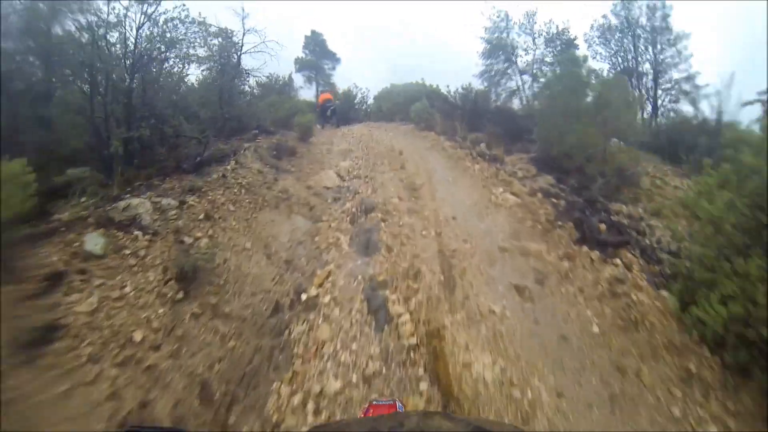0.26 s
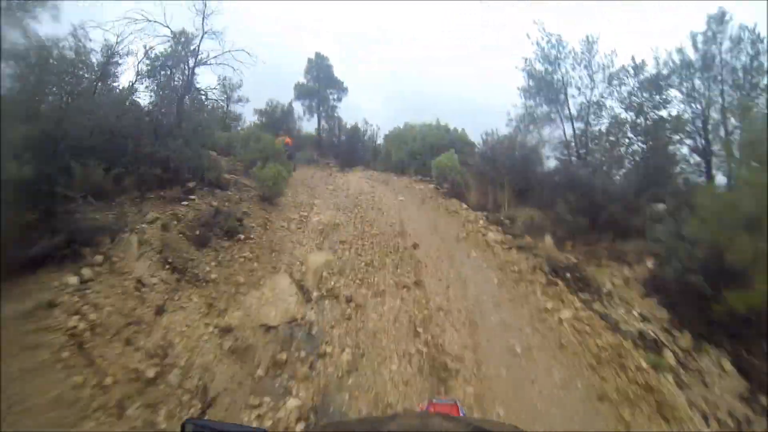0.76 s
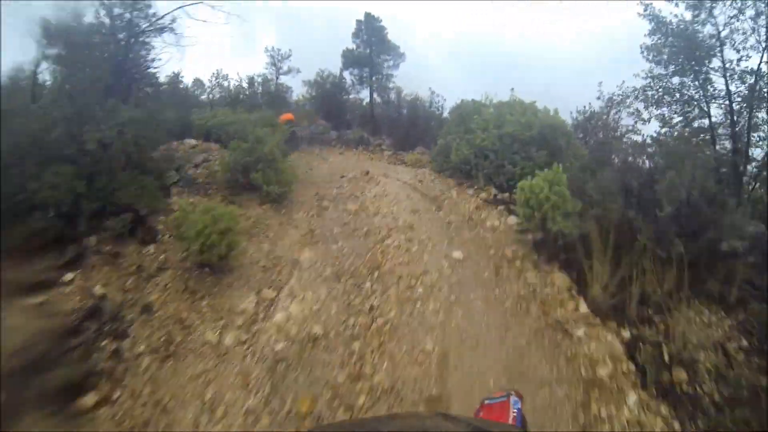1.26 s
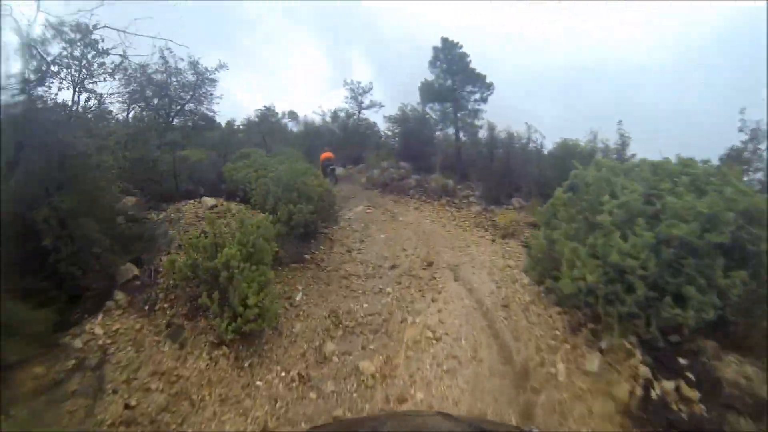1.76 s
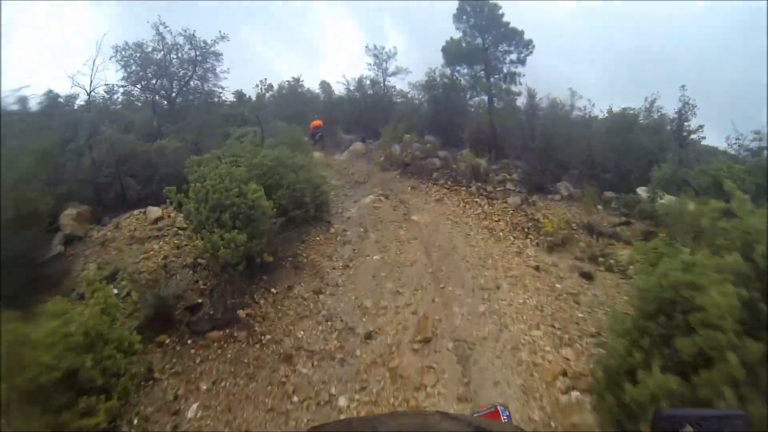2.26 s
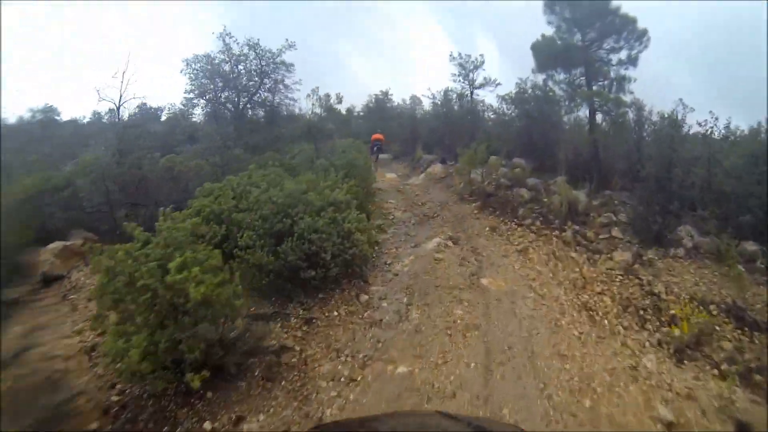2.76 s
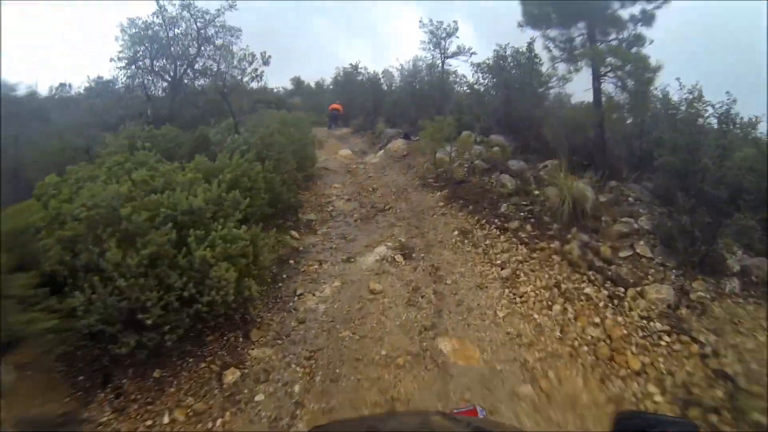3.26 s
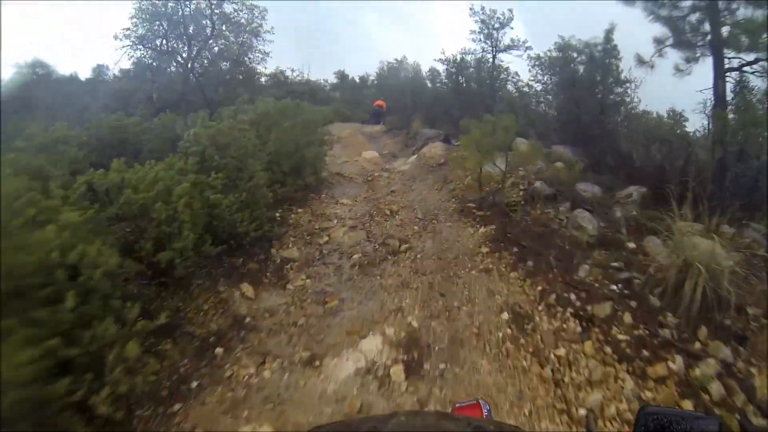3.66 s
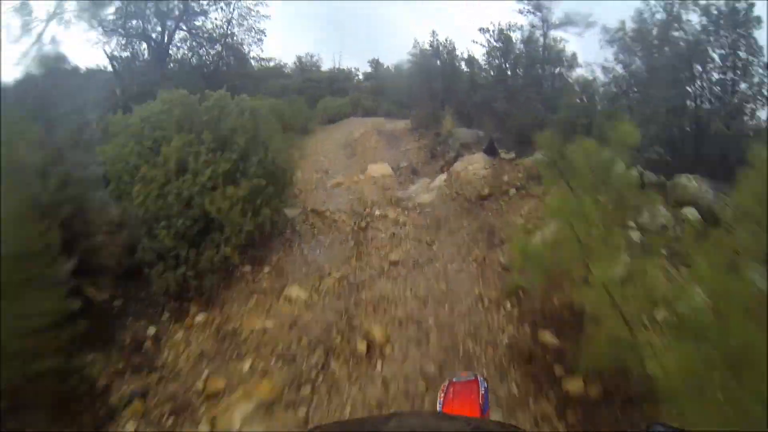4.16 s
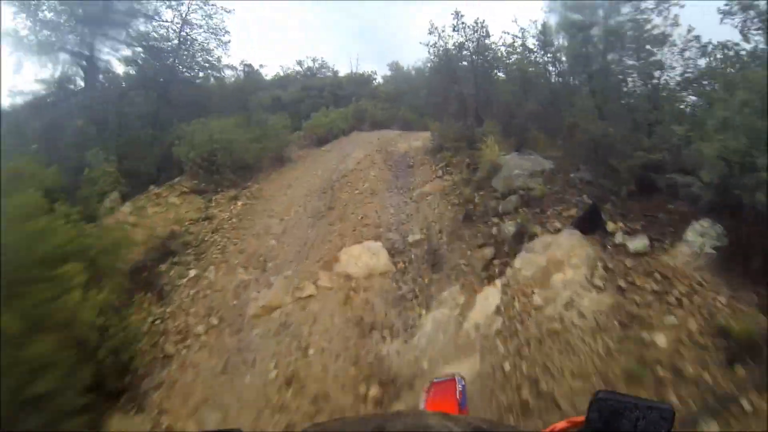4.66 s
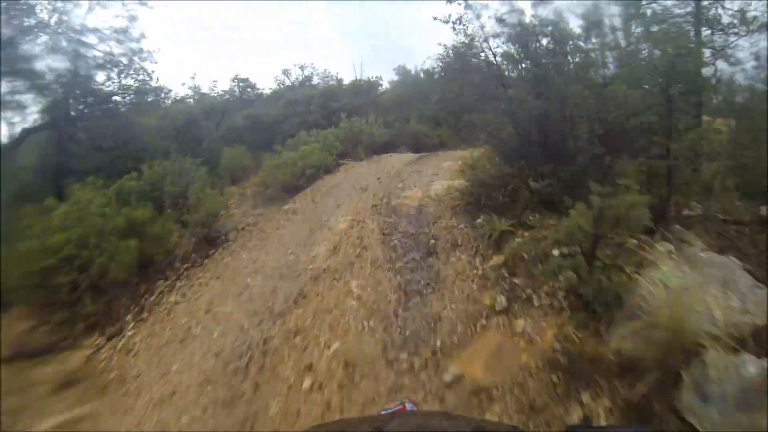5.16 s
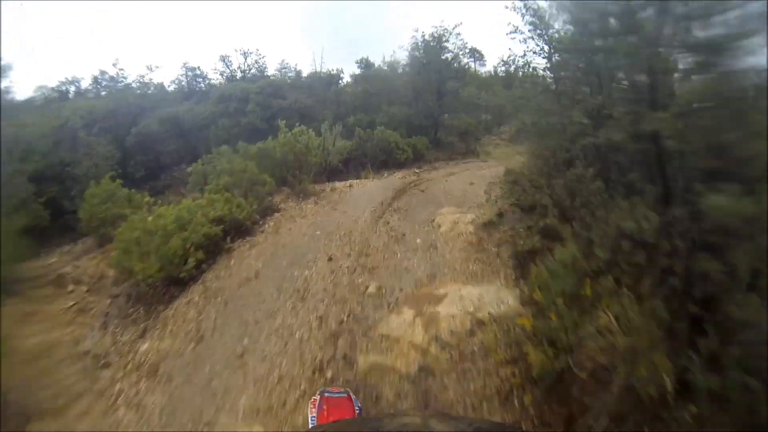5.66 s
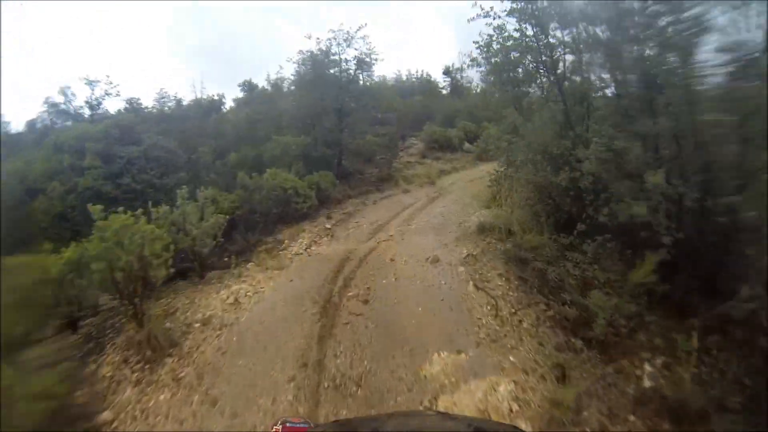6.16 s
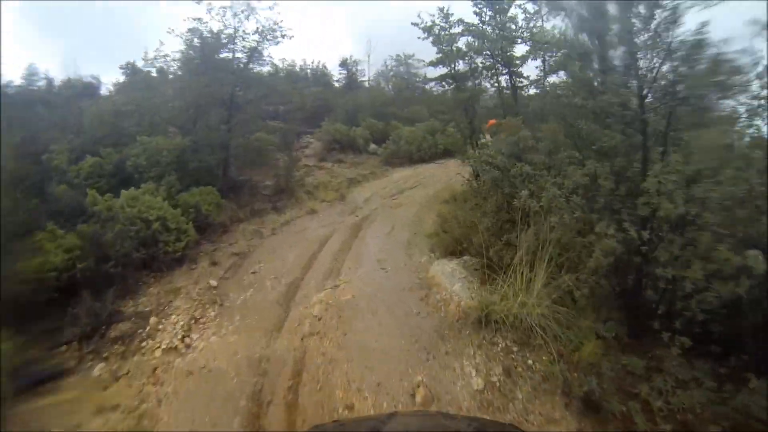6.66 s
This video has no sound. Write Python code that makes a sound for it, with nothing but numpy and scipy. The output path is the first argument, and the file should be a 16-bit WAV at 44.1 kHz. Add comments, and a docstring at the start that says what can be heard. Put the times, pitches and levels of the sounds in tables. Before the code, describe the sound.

A dirt bike engine runs throughout, close and onboard, with rapid separate firing pulses and a raspy exhaust. It starts under throttle, drops to a rough burble with short bursts, surges strongly in the middle, then backs off and picks up at the very end. Stones snap and knock, loose plastic chatters, and wind buffets low. The helmet microphone in its plastic housing makes everything boxy, mono and dry, in open air.

```python
"""A single-cylinder four-stroke dirt bike growls from the start, over a rattle of loose parts and a wind rumble.
It climbs a rocky trail, heard by a helmet microphone in a closed plastic case.
Each firing sends a pulse through the pipe's resonances and a crack out of its mouth; stones strike short rings.
Loose parts click at random, chain links tap their slider, and wind and hiss are filtered noise.
The case's own resonances, strongest between 1.2 and 1.6 kHz, colour the rattle, gas noise, knocks and hiss."""
import sys
import numpy as np
from scipy import signal
from scipy.io import wavfile
from scipy.ndimage import uniform_filter1d

SR = 44100
rng = np.random.default_rng(int(sys.argv[2]) if len(sys.argv) > 2 else 0)


def unload_wav(signal):
    """Save mono or channel-first audio to the path in sys.argv[1] as 16-bit WAV at rate SR, clipped to [-1, 1]."""
    wavfile.write(
        sys.argv[1],
        SR,
        np.round(np.clip(np.atleast_2d(signal).T, -1, 1) * 32767).astype(np.int16),
    )


N = 305172

# Engine speed up the trail. Each row: time in seconds, firings per second.
ENGINE_SPEED = [(0.0, 30.79), (0.09, 35.09), (0.28, 33.78), (0.37, 40.2), (0.55, 35.78), (0.74, 38.56),
                (0.83, 33.09), (0.92, 39.61), (1.2, 38.08), (1.29, 34.62), (1.57, 29.72), (2.03, 33.81),
                (2.12, 29.9), (2.31, 35.79), (2.49, 34.44), (2.58, 28.46), (2.77, 32.67), (2.95, 28.68),
                (3.23, 36.63), (3.6, 33.6), (3.78, 38.5), (3.88, 38.12), (3.97, 42.75), (4.34, 39.25),
                (4.43, 35.53), (4.71, 39.13), (5.07, 31.37), (5.26, 36.7), (5.35, 33.65), (5.54, 34.9),
                (5.81, 31.33), (5.91, 34.21), (6.18, 32.05), (6.27, 28.13), (6.64, 32.94), (6.83, 44.3),
                (6.92, 42.6)]
# Shaking over the rocks. Each row: time in seconds, rattle level in dB before its random waver.
ROCK_SHAKING = [(0, -26.5), (.4, -34.5), (.7, -29.5), (1.2, -31.5), (1.6, -33.5), (1.73, -42.5),
                (1.93, -27.5), (2.06, -44), (2.28, -28), (2.42, -42.5), (3.0, -43.5), (3.3, -40),
                (3.75, -32), (4.08, -33), (4.4, -35.5), (4.7, -27.5), (4.95, -35), (5.2, -32), (5.7, -33.5),
                (6.3, -39), (6.65, -40.5), (6.8, -30.5), (6.92, -34.5)]
# Resonances of the plastic case round the microphone. Each row: pitch in Hz, width in Hz, relative level in dB.
CASE_MODES = [(1204, 188.5, 11.5), (1584, 412, 7.5), (2280, 362, -0.5), (2867, 223, -5), (3520, 265, -10),
              (4900, 340, -19), (6470, 670, -28.5), (7740, 350, -30.5), (9650, 1400, -38.5),
              (13100, 9900, -45.5)]


def from_db(db):
    """Decibels to gain."""
    return 10 ** (np.asarray(db) / 20)


def rms_one(x):
    """Scale to rms 1."""
    return x / np.sqrt(np.mean(x ** 2) + 1e-20)


def in_time(rows):
    """Columns of a curve table after its times, one value a sample."""
    s, *columns = np.transpose(rows)
    return [np.interp(np.arange(N) / SR, s, column) for column in columns]


def drift(per_s):
    """Random levels joined by straight lines, with a spread of about 1."""
    count = int(N / SR * per_s) + 2
    wander = np.interp(np.arange(N) / SR * per_s, np.arange(count), rng.standard_normal(count))
    return wander / np.sqrt(2 / 3)   # the straight lines narrow the spread


def band(x, low_hz, high_hz, order=2):
    """Butterworth band-pass."""
    return signal.sosfilt(signal.butter(order, [low_hz, high_hz], "band", fs=SR, output="sos"), x)


def resonate(x, hz, width_hz):
    """One resonance, gain 1 on top."""
    r = np.exp(-np.pi * width_hz / SR)
    top = np.array([1, 0, -1]) * (1 - r * r) / 2
    bottom = [1, -2 * r * np.cos(2 * np.pi * hz / SR), r * r]
    return signal.lfilter(top, bottom, x + 1e-18)


def body(x, modes):
    """Resonances side by side, signs alternating."""
    return sum((-1) ** k * from_db(db) * resonate(x, hz, width) for k, (hz, width, db) in enumerate(modes))


def burst(clicks, hz, width_hz):
    """A resonance thrice over: a unit click gives a short rounded burst of height 1."""
    unit = signal.unit_impulse(2000)
    for _ in range(3):
        clicks, unit = resonate(clicks, hz, width_hz), resonate(unit, hz, width_hz)
    return clicks / np.abs(unit).max()


def fade(clicks, t60):
    """Each click becomes a step of its own height that falls 60 dB in t60 seconds."""
    return signal.lfilter([1], [1, -from_db(-60 / (t60 * SR))], clicks + 1e-18)


def even(x, seconds):
    """Hold the slow level near rms 1."""
    size = int(seconds * SR)
    power = uniform_filter1d(uniform_filter1d(x ** 2, size=size), size=size)
    return x / np.sqrt(power + 1e-12)


def ticks(cycles, spread_db):
    """A click at each whole cycle, every one with a strength of its own."""
    at = np.flatnonzero(np.diff(np.floor(cycles)) > 0)
    out = np.zeros(N)
    out[at] = from_db(spread_db * rng.standard_normal(len(at)))
    return out


def placed(times, sizes):
    """Clicks of given sizes at given seconds."""
    out = np.zeros(N)
    out[np.minimum((np.asarray(times) * SR).astype(int), N - 1)] = sizes
    return out


def orders(cycles, width_hz):
    """Multiples 4 to 17 of the firing rate as clean tones, loudest near a wandering centre and an octave above."""
    # Where the boom is strongest. Each row: time in seconds, centre in Hz.
    boom_centre = [(0, 235), (.35, 210), (.62, 260), (.76, 290), (.9, 235), (2.5, 205), (3.0, 215),
                   (3.25, 250), (3.45, 215), (3.6, 200), (3.88, 225), (4.05, 285), (4.25, 255), (4.6, 235),
                   (5.0, 230), (5.5, 255), (6.2, 220), (6.92, 280)]
    lag_s = 0.00045   # the tones peak together just after each firing
    upper_multiple, upper_width_hz, upper_db = 1.908, 73, -11.5   # second range, about an octave up
    per_s, centre_hz = in_time(ENGINE_SPEED)[0], in_time(boom_centre)[0]
    late, out = cycles - lag_s * per_s, 0
    for k in range(4, 18):
        size = np.exp(-((k * per_s - centre_hz) / width_hz) ** 2)
        upper = np.exp(-((k * per_s - upper_multiple * centre_hz) / upper_width_hz) ** 2)
        size += from_db(upper_db) * upper
        out += size * np.cos(2 * np.pi * k * late)
    return even(out, .08)


def engine():
    """Firings boom in the pipe and crack at its mouth; gas noise trails each crack and the crank hums."""
    # Throttle. Each row: time in seconds, exhaust boom level in dB, exhaust crack level in dB.
    throttle = [(0, -30, -37), (.26, -31.5, -13), (.35, -28.5, -8.5), (.69, -29, -9.5), (.86, -32.5, -27),
                (.95, -31, -14), (1.3, -32.5, -17), (1.38, -35.5, -32), (1.47, -28.5, -14),
                (1.64, -37.5, -29), (1.82, -39.5, -38), (2.08, -44, -18), (2.16, -33.5, -29),
                (2.25, -27, -5), (2.34, -32.5, -19.5), (2.42, -48.5, -40), (2.51, -40, -36),
                (2.6, -30.5, -7.5), (2.94, -46.5, -31), (3.03, -35, -14), (3.46, -27.5, -6.5),
                (3.63, -28, -7), (3.8, -29.5, -4.5), (3.95, -27.5, -2.5), (4.1, -29.5, -7),
                (4.32, -29.5, -10.5), (4.41, -32.5, -17.5), (4.67, -29, -12.5), (4.84, -33, -23.5),
                (5.54, -31, -28), (5.71, -33.5, -30), (5.88, -42, -46), (6.06, -37.5, -45),
                (6.14, -26.5, -17), (6.23, -39, -34), (6.49, -43.5, -36), (6.66, -35.5, -44),
                (6.75, -32.5, -31), (6.92, -34.5, -17)]
    # Uneven burning, strong with the throttle shut. Each row: time in seconds, roughness from 0 to 1.
    roughness = [(0, .35), (1.5, .4), (1.7, .9), (2.1, .9), (2.25, .4), (2.9, .6), (3.1, .15), (3.7, .15),
                 (4.0, .25), (5.7, .25), (5.9, .9), (6.08, .3), (6.2, .3), (6.4, .8), (6.6, .25),
                 (6.92, .2)]
    # Crank hum. Each row: time in seconds, level in dB before its random waver.
    crank_hum = [(0, -35), (.5, -36.5), (1.3, -40), (2.0, -42), (2.9, -46), (3.3, -38.5), (4.07, -34.5),
                 (4.5, -37.5), (5.2, -34.5), (5.9, -40.5), (6.6, -43), (6.92, -30.5)]
    # Exhaust pipe resonances. Each row: pitch in Hz, width in Hz, relative level in dB.
    pipe_modes = [(81, 11, -32), (140.7, 105, -4.5), (215, 92, 2), (316.8, 44, -0.5), (442.6, 104, -5.5),
                  (873, 42, -6)]
    # Pipe mouth heard through the case. Each row: pitch in Hz, width in Hz of one pass, relative level in dB.
    mouth_modes = [(1438, 490, 0), (2990, 470, -21.5), (4700, 230, -62)]
    # Echoes from pipe and ground. Each row: delay in seconds, level in dB before a random cut.
    crack_echoes = [(.0072, -11), (0.0114, -19), (0.02, -13.5)]
    # Firings that crack harder than their neighbours. Each row: time in seconds, extra level in dB.
    hard_firings = [(1.125, 14.5), (2.254, 2), (2.283, 6), (2.311, 11), (2.742, 3.5), (3.099, 3),
                    (3.726, 0.5), (3.934, 2.5)]
    first_firing = .155   # share of a cycle before the first firing
    load_db = -16.5, -9.5   # crack levels at light and at full load
    pulse_share, orders_width_hz = (0.42, 0.31), (69, 21)   # at light and at full load
    chirp_hz, chirp_width_hz, chirp_db = 874, 153, -9.5   # each firing also chirps in the pipe
    hum_waver_db, gas_db = 4.5, -28   # gas noise is set against the crack

    cycles = np.cumsum(in_time(ENGINE_SPEED)[0]) / SR - first_firing
    boom_db, crack_db = in_time(throttle)
    hum_db = in_time(crank_hum)[0] + hum_waver_db * drift(9.0)
    rough = in_time(roughness)[0]
    firings = ticks(cycles, spread_db=1.35)
    noise = rng.standard_normal((3, N))

    soft = band(firings, 47, 590)   # the pressure pulse in the pipe is blunt
    clean = np.interp(crack_db, load_db, pulse_share) * rms_one(body(soft, pipe_modes))
    width_hz = np.interp(crack_db, load_db, orders_width_hz)
    clean += 0.44 * (1 - rough) ** 2 * orders(cycles, width_hz)
    clean += from_db(chirp_db) * burst(firings, chirp_hz, chirp_width_hz)
    growl = noise[0] * (0.033 + fade(firings, 0.17))
    boom = np.sqrt(1 - rough ** 2) * clean + rough * rms_one(body(growl, pipe_modes))

    hum = np.sqrt(2) * np.sin(4 * np.pi * cycles - 1.2)   # the crank turns twice a firing
    hum += rough * 2.08 * rms_one(band(noise[2], 67.4, 113.5))

    crack, at = firings.copy(), np.flatnonzero(firings)
    for s, extra_db in hard_firings:
        nearest = at[np.abs(at - s * SR).argmin()]
        crack[nearest] *= from_db(extra_db)
    for delay, echo_db in crack_echoes:
        crack += from_db(echo_db) * np.roll(firings, int(delay * SR)) * rng.uniform(0.6, 1.0, N)
    crack = sum(from_db(db) * burst(crack, hz, width) for hz, width, db in mouth_modes)
    gas = noise[1] * np.roll(fade(firings, 0.079), int(0.0019 * SR))
    crack += from_db(gas_db) * rms_one(band(body(gas, CASE_MODES), 600, 5500))
    return from_db(boom_db) * even(boom, 0.039) + from_db(hum_db) * hum + from_db(crack_db) * crack


def rattle():
    """Dense uneven clicks of gravel and loose plastic ring the case, in clumps and flurries."""
    # Short flurries. Each row: start in seconds, length in seconds before the final fall, added level in dB.
    flurries = [(0.912, 0.019, -21.5), (1.486, 0.0087, -19), (1.645, 0.048, -29), (2.19, 0.009, -11.5),
                (5.211, 0.014, -21.5), (5.968, 0.024, -24.5), (6.1, 0.039, -26.5), (6.163, 0.055, -36),
                (6.32, 0.059, -37.5), (6.722, 0.014, -20.5), (2.574, 0.018, -25), (5.457, 0.011, -34)]
    waver_db = 2.5   # bumps come and go at random
    clumps = from_db(3.7 * rms_one(band(rng.standard_normal(N), 34, 43.7, order=1)))
    sizes = from_db(2.3 * np.minimum(rng.exponential(1, N), 4)) * rng.choice([-1, 1], N)
    clicks = sizes * clumps * (rng.random(N) < 2000 / SR)   # about 2000 clicks a second
    level = from_db(in_time(ROCK_SHAKING)[0] + waver_db * drift(12.0))
    t = np.arange(N) / SR
    for s, length, db in flurries:
        corners = [s, s + .002, s + length, s + 1.4 * length]
        level += from_db(db) * np.interp(t, corners, [0, 1, .7, 0])
    return level * even(band(body(clicks, CASE_MODES), 740, 5500), 0.05)


def wind():
    """Lumpy low rumble of air on the case, as low-band noise: a steady part and short gusts."""
    # Steady wind. Each row: time in seconds, level in dB.
    steady_wind = [(0, -27.5), (1.4, -32), (1.85, -41.5), (2.4, -35.5), (2.9, -42.5), (3.3, -32),
                   (3.75, -34.5), (4.2, -33), (5.3, -33), (6.2, -42.5), (6.92, -40)]
    # Gusts. Each row: time of the peak in seconds, added level in dB at the peak.
    gusts = [(.13, -30), (.73, -21), (.89, -23), (1.25, -24), (1.35, -21), (2.08, -33), (2.21, -26),
             (2.42, -33), (3.43, -45), (3.72, -36), (3.95, -27), (4.35, -30), (5.01, -33), (5.21, -27.5),
             (5.55, -25), (5.76, -39), (5.88, -26), (6.3, -35)]
    gust_s = 0.035   # from a gust's peak to 1/e of it
    level, t = from_db(in_time(steady_wind)[0]), np.arange(N) / SR
    for s, db in gusts:
        level += from_db(db) * np.exp(-((t - s) / gust_s) ** 2)
    return level * even(band(rng.standard_normal(N), 11.8, 31.2, order=2), 0.1)


def hiss():
    """Engine and tyre hiss: treble noise through narrowed case resonances."""
    # Hiss. Each row: time in seconds, level in dB.
    hiss_level = [(0, -45), (.42, -40), (1.5, -46), (1.71, -53), (1.85, -40), (2.35, -50.5), (3.06, -53),
                  (3.2, -44.5), (4.08, -37), (4.3, -45), (4.91, -44.5), (5.3, -47.5), (6.2, -49.5),
                  (6.5, -63), (6.92, -57)]
    narrow = [(hz, 0.69 * width, db) for hz, width, db in CASE_MODES]
    noise = band(body(rng.standard_normal(N), narrow), 3750, 21000)
    return from_db(in_time(hiss_level)[0]) * rms_one(noise)


def small_knocks():
    """Rows like those of the loud knocks, at random times, their levels partly following the shaking."""
    count, follow = 30, 0.3   # follow: share of the rattle's swing
    mean_ring_db, mean_snap_db, mean_case_db, spread_db = -28, -50, -30, 4
    low_hz, high_hz = 1920, 3020
    when, pitch = rng.random((count, 2)).T
    at = when * (N - 1000)   # leaves room for the last ring
    shake_db = in_time(ROCK_SHAKING)[0]
    shake_db = follow * (shake_db[at.astype(int)] - shake_db.mean())
    ring, snap, case = shake_db + spread_db * rng.standard_normal((count, 3)).T
    ring_hz = low_hz + (high_hz - low_hz) * pitch ** 2
    return np.transpose([at / SR, mean_ring_db + ring, ring_hz, mean_snap_db + snap, mean_case_db + case])


def knocks():
    """A knock is a bright snap, the short ring of the part that is hit and a thud of the case."""
    # Loud knocks of stones and hard parts. Each row: start in seconds, ring strength in dB, ring pitch in Hz,
    # snap strength in dB, case thud peak in dB. Ring and snap strengths are relative.
    loud_knocks = [(0.0937, -19.5, 1810, -20, -11), (0.2595, -28, 2290, -24.5, -26),
                   (0.4811, -41, 2160, -39, -14), (0.4958, -37, 2420, -34, -28),
                   (0.638, -10.5, 3200, -15.5, -5), (0.8126, -28, 1850, -47, -26),
                   (0.8709, -18, 2430, -50, -12.5), (0.9133, -20, 2750, -37, -23),
                   (0.9267, -29, 1960, -34, -25), (1.0509, -12.5, 3620, -14, -12),
                   (1.0692, -15.5, 3300, -23, -13), (1.0822, -17, 1850, -28, -28),
                   (1.148, -15, 1730, -22, -7.5), (1.297, -27, 1850, -53, -16),
                   (1.4653, -30, 1910, -34, -14), (1.514, -23.5, 1930, -48, -14.5),
                   (1.6616, -23, 1850, -56, -20), (1.6734, -23.5, 1850, -50, -25),
                   (1.7552, -30, 1830, -47, -29), (1.787, -30, 1890, -46, -23),
                   (1.8039, -26.5, 1830, -34, -37), (1.8135, -26.5, 1840, -45, -14),
                   (1.8942, -20.5, 1860, -54, -16), (1.9121, -9.5, 2540, -29, -17),
                   (1.9301, -17.5, 2300, -23.5, -22), (2.2964, -18, 1830, -26.5, -13),
                   (2.375, -29.5, 1890, -70, -21), (2.5672, -24.5, 1890, -56, -20),
                   (2.6977, -6, 3640, -13, -4.5), (2.8657, -9, 2470, -19, -16.5),
                   (3.2545, -27, 2100, -46, -20), (3.3032, -13, 2200, -20.5, -13),
                   (3.6166, -7.5, 2200, -21.5, -7), (3.7486, -11.5, 1820, -38, -7),
                   (3.8805, -26, 2070, -48, -8), (3.9942, -21, 1850, -24, -27),
                   (4.0042, -13.5, 2100, -38, -13), (4.2752, -22.5, 1890, -31, -34),
                   (4.4312, -29, 1850, -41, -30), (4.4405, -23, 1880, -32, -10),
                   (4.5121, -9, 3570, -17.5, -16), (4.5828, -23, 1980, -36, -27),
                   (4.6112, -23, 1930, -38, -33), (4.7038, -14, 3480, -18, -6.5),
                   (4.7396, -10, 3180, -17, -5.5), (4.8824, -26, 2670, -25, -34),
                   (4.9222, -22, 2440, -50, -20), (5.0818, -11.5, 2040, -22.5, -19),
                   (5.1708, -19.5, 1960, -53, -17), (5.2054, -18.5, 2030, -48, -18),
                   (5.2849, -20, 3070, -32, -21), (5.4509, -19, 2170, -26, -15),
                   (5.4566, -21, 1840, -49, -14), (5.515, -16.5, 2180, -24.5, -16),
                   (5.6986, -18, 1760, -23.5, -12), (5.7142, -26, 1900, -56, -17),
                   (5.8753, -27, 1980, -33.5, -23), (5.906, -24, 1970, -40, -30),
                   (5.9808, -22, 2680, -48, -11), (6.0033, -8, 3140, -26.5, -9.5),
                   (6.1225, -17, 2050, -18.5, -18), (6.1807, -28, 1840, -55, -21),
                   (6.2441, -30.5, 1910, -62, -20), (6.3355, -29, 2210, -54, -29),
                   (6.3617, -29, 1970, -51, -27), (6.402, -5.5, 2600, -18, -1),
                   (6.4882, -10.5, 3100, -51, -13), (6.4985, -30, 1880, -57, -13),
                   (6.573, -30, 2260, -61, -15), (6.7208, -22.5, 1890, -59, -31),
                   (6.8151, -21, 3080, -32.5, -27)]
    s, ring_db, ring_hz, snap_db, case_db = np.vstack([loud_knocks, small_knocks()]).T
    noise = rng.standard_normal((2, N))
    bright = [(hz, width, db + 40) for hz, width, db in CASE_MODES[5:]]
    out = body(noise[0] * fade(placed(s, from_db(snap_db)), 0.0058), bright)
    out += band(noise[1] * fade(placed(s, from_db(ring_db + 11.5)), 0.012), 2130, 3426)   # noisy part of the ring
    out += burst(placed(s, from_db(case_db)), 1490, 660)
    t = np.arange(800) / SR
    for start, strength_db, hz in zip((s * SR).astype(int), ring_db, ring_hz):
        dying = from_db(strength_db + 2.5 - 60 * t / 0.012)   # falls 60 dB in 12 ms
        out[start:start + len(t)] += dying * np.sin(2 * np.pi * hz * t)
    return out


def chain():
    """Each link taps the slider; the taps and a little noise after them ring a few bright modes."""
    # Chain on its slider. Each row: time in seconds, links per second, level in dB.
    chain_run = [(.75, 87, -66), (.95, 80, -55), (1.3, 82, -53.5), (1.5, 122, -46.5), (1.57, 99, -64),
                 (1.8, 67, -46.5), (1.92, 120, -54), (2.18, 94, -57), (2.34, 120, -54)]
    # Ring of the taps. Each row: pitch in Hz, width in Hz of one pass, relative level in dB.
    chain_modes = [(4760, 330, 0), (6450, 600, -9), (7400, 600, -15)]
    per_s, level_db = in_time(chain_run)
    running = np.interp(np.arange(N) / SR, [.75, .85, 2.33, 2.4], [0, 1, 1, 0])
    taps = ticks(np.cumsum(per_s) / SR, spread_db=1.5)
    taps += .12 * rng.standard_normal(N) * fade(taps, .006)
    rings = 0
    for hz, width, db in chain_modes:
        rings += from_db(db) * resonate(resonate(taps, hz, width), hz, width)
    return running * from_db(level_db) * even(rings, 0.046)


def struck(rows):
    """Single dull notes that swell for about a cycle and die."""
    out = np.zeros(N)
    for s, strength_db, hz, t60 in rows:
        start = int(s * SR)
        t = np.arange(min(int(t60 * SR), N - start)) / SR
        swell = 1 - np.exp(-t * hz * 3.1)
        dying = from_db(strength_db + 5.5 - 60 * t / t60)
        out[start:start + len(t)] += dying * swell * np.sin(2 * np.pi * hz * t)
    return out


def thumps():
    """The suspension thumps: low notes that die in a fraction of a second."""
    # Each row: start in seconds, relative strength in dB, pitch in Hz, time to fall 60 dB in seconds.
    suspension_thumps = [(0.93, -21.5, 90, 0.27), (1.677, -21.5, 106, 0.13), (2.191, -20.5, 97.2, 0.32),
                         (4.658, -21, 87, 0.13), (5.172, -22, 84.4, 0.24), (5.969, -28, 128.5, 0.2)]
    return struck(suspension_thumps)


def clunks():
    """Hollow clunks: short notes of middle pitch that fall 60 dB in 35 ms."""
    # Each row: start in seconds, relative strength in dB, pitch in Hz.
    hollow_clunks = [(1.489, -15, 845), (1.643, -32, 860), (2.925, -37.5, 706), (5.889, -29.5, 710),
                     (6.571, -31, 645)]
    return struck([(s, db, hz, .035) for s, db, hz in hollow_clunks])


def scene():
    """All sources at one microphone."""
    return (engine() + rattle() + wind() + hiss() + knocks() + chain() + thumps() + clunks())[None]


def record(dry):
    """The case dulls the highest treble, peaks are rounded, the top is cut."""
    dull = signal.sosfilt(signal.butter(4, 13800, fs=SR, output="sos"), dry)
    rounded = 1.28 * np.tanh(dull / 1.443)
    return signal.sosfilt(signal.cheby2(12, 70, 16500, fs=SR, output="sos"), rounded)   # 70 dB down from 16.5 kHz


dry = scene()
out = record(dry)
unload_wav(out)
```